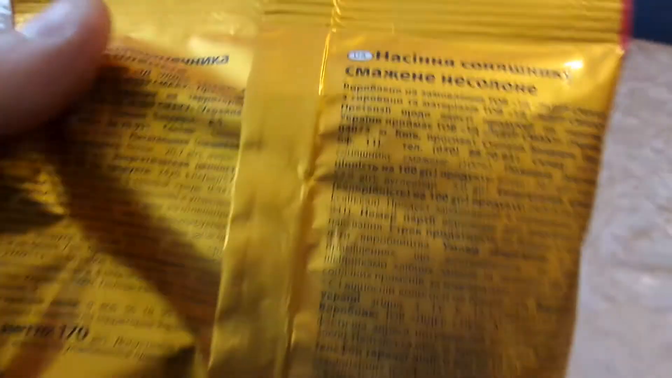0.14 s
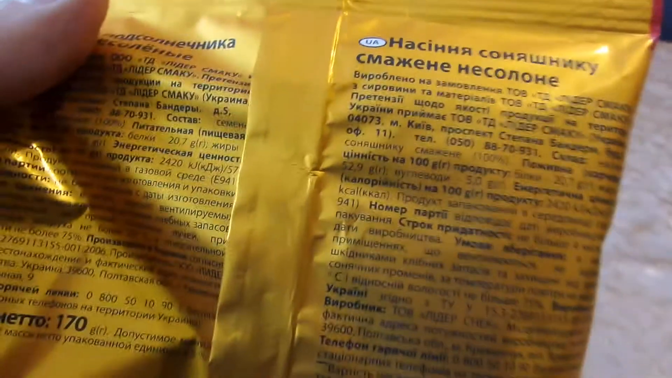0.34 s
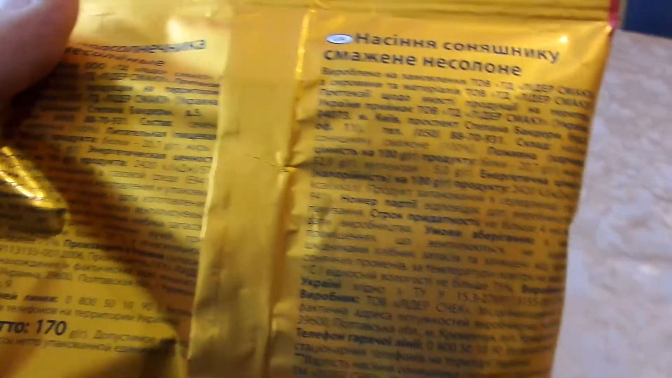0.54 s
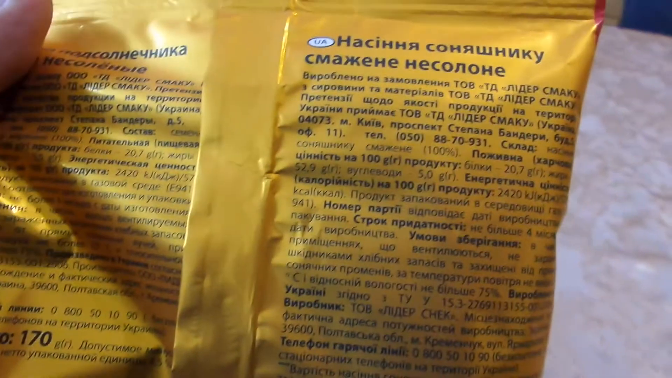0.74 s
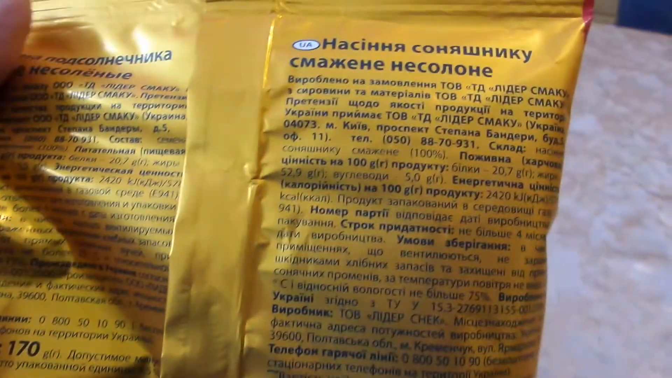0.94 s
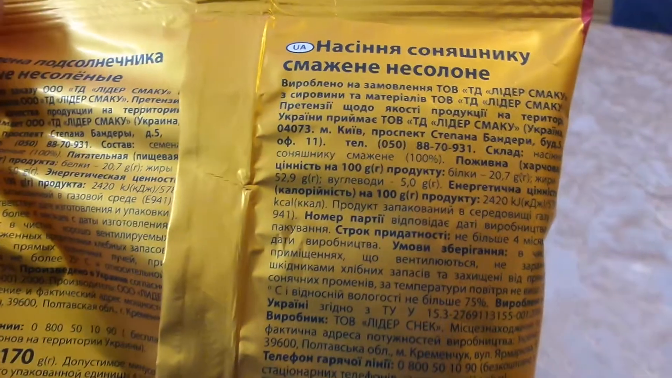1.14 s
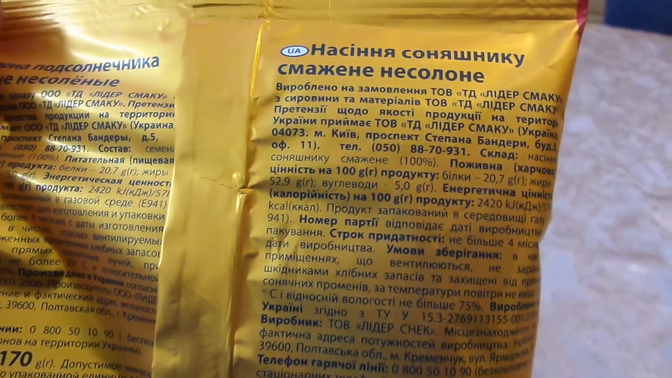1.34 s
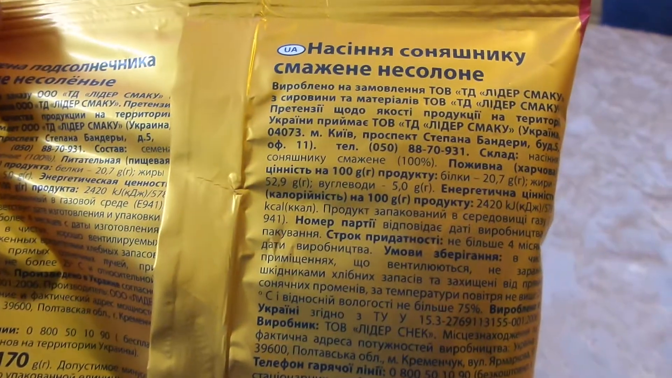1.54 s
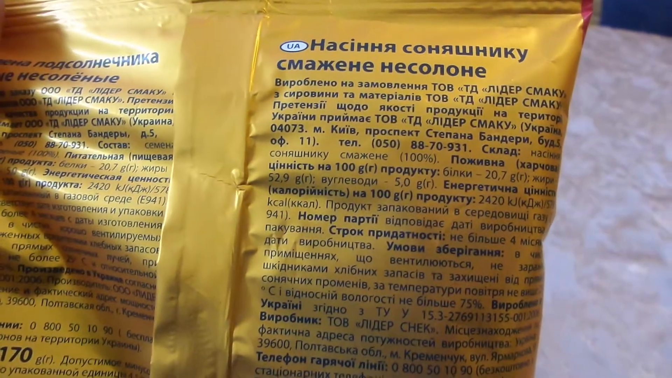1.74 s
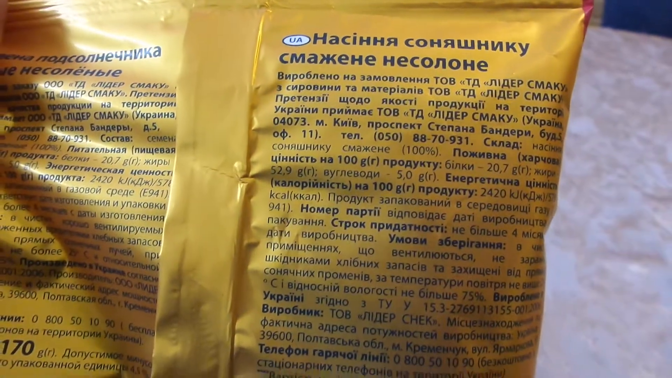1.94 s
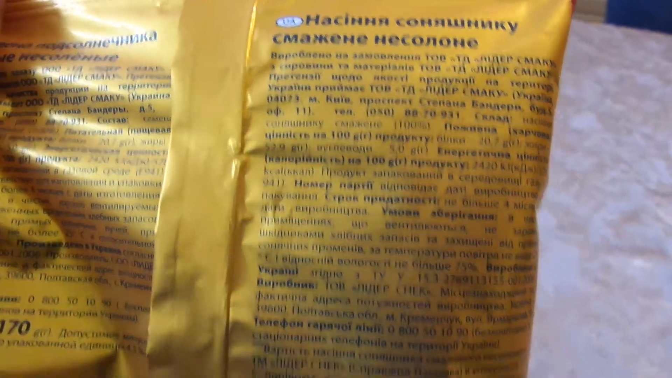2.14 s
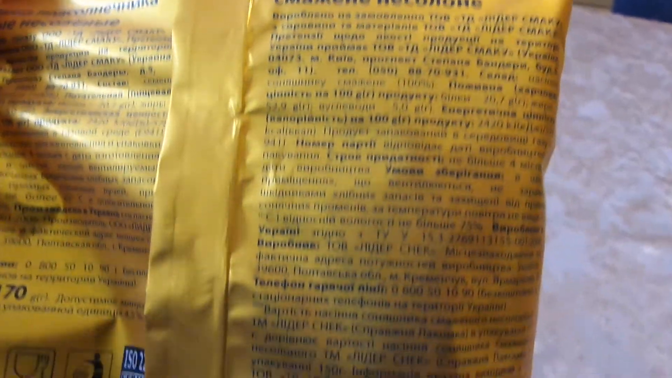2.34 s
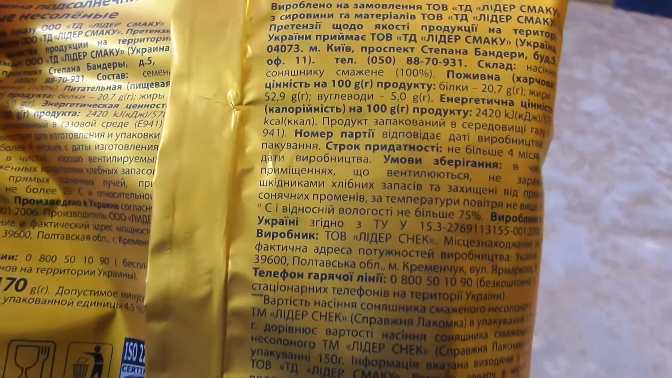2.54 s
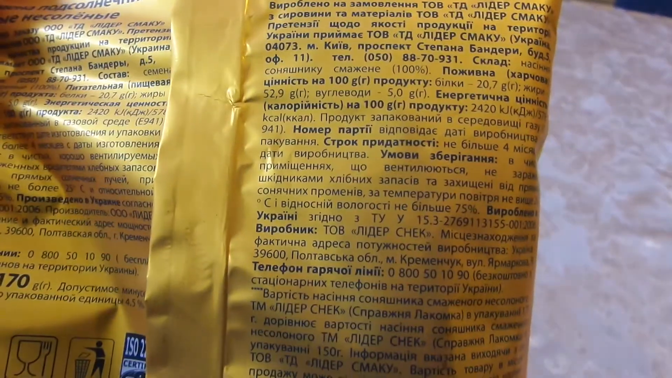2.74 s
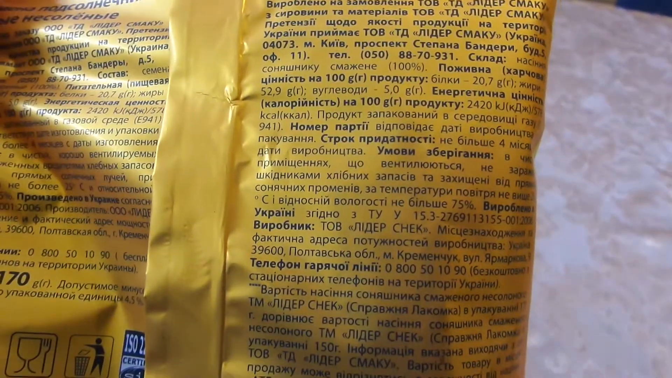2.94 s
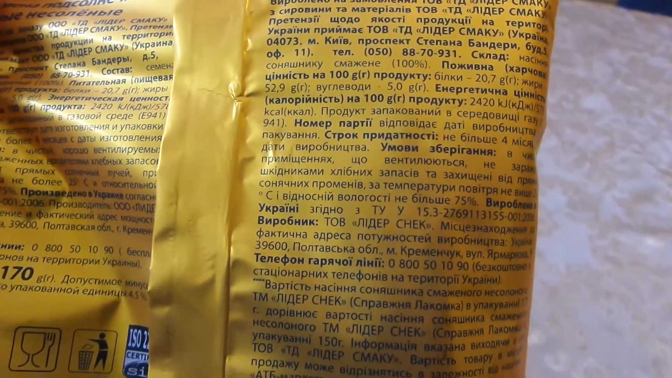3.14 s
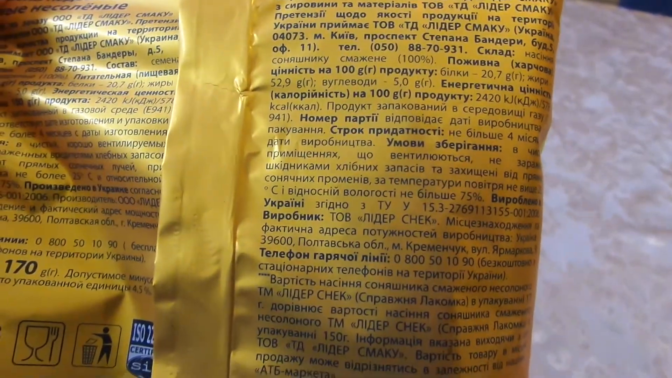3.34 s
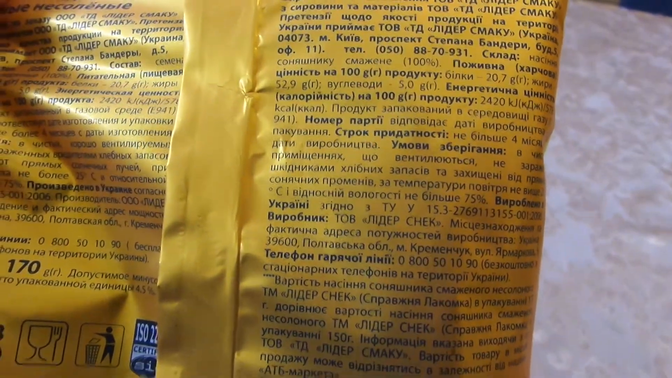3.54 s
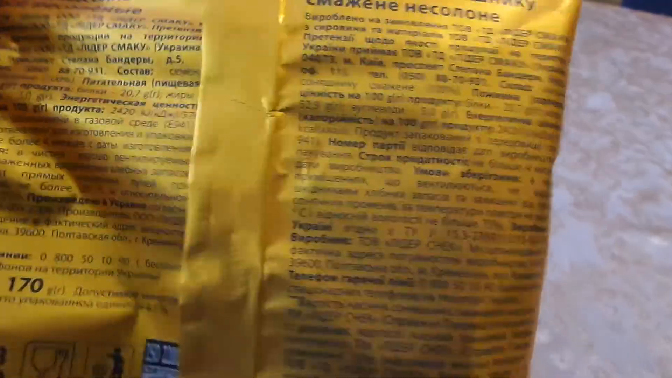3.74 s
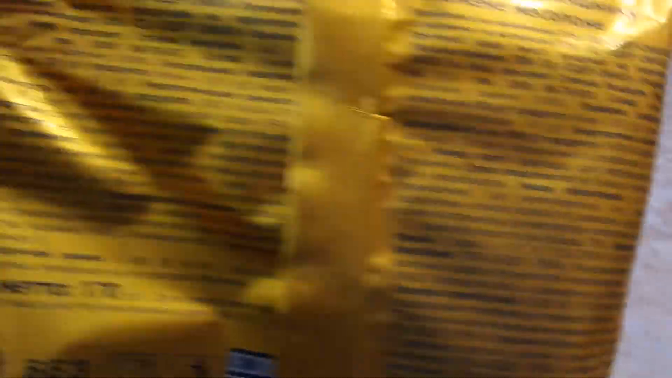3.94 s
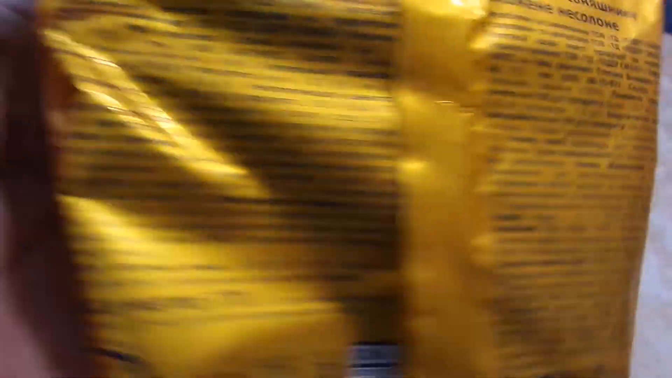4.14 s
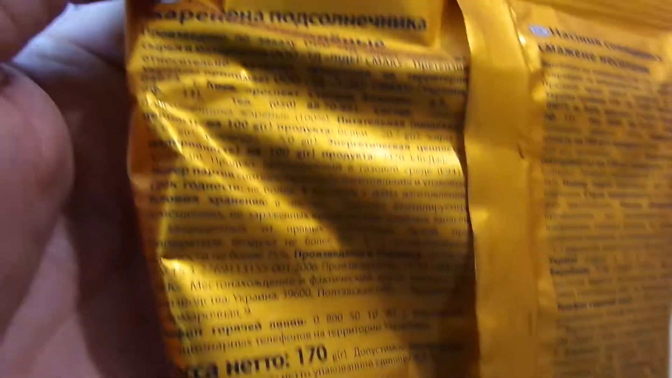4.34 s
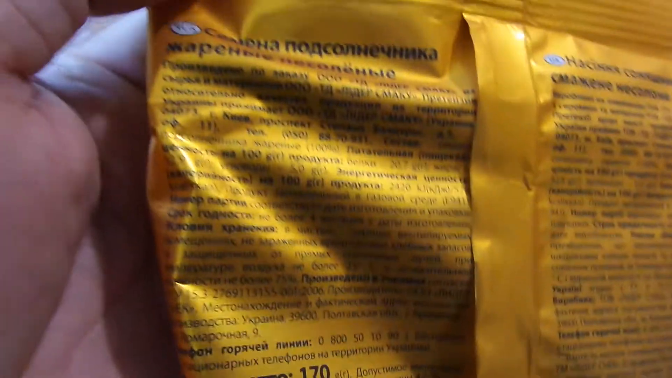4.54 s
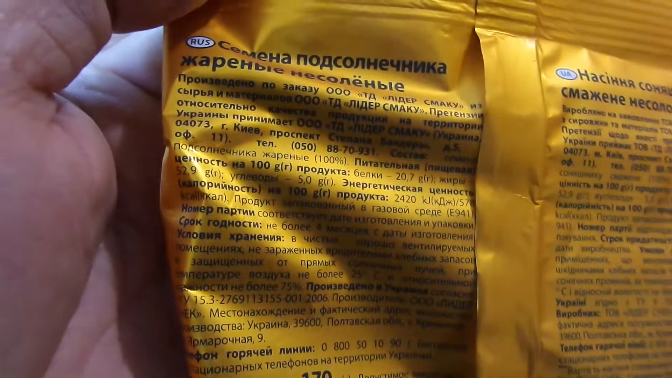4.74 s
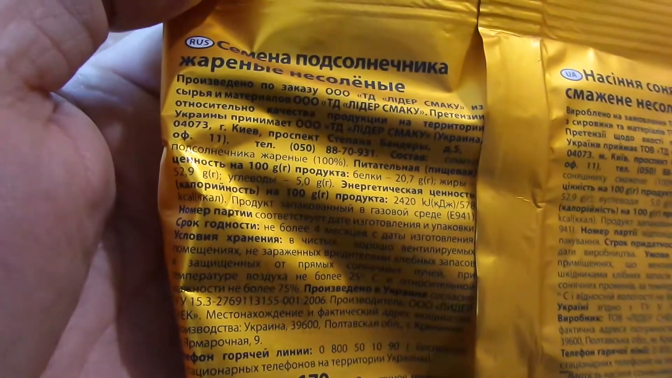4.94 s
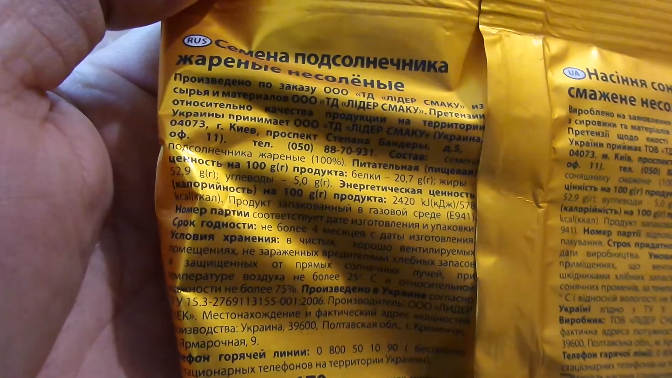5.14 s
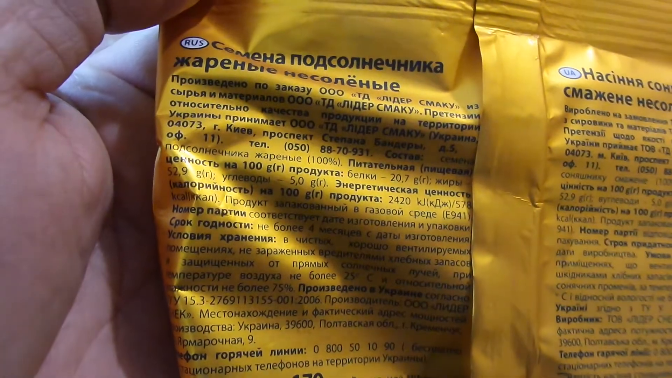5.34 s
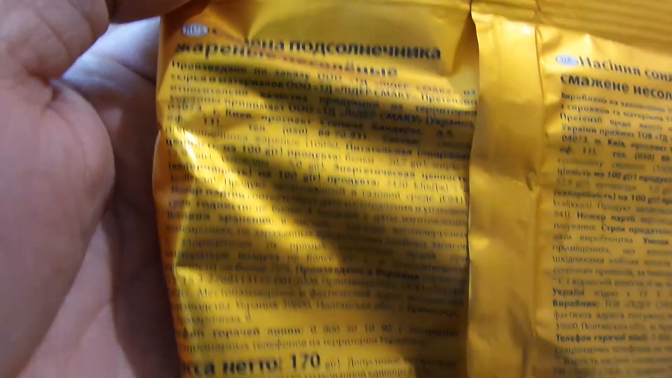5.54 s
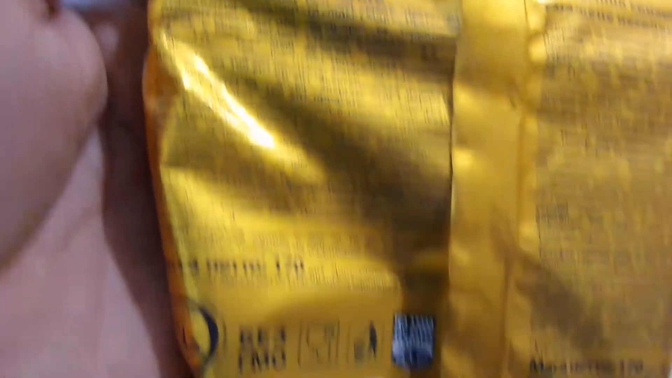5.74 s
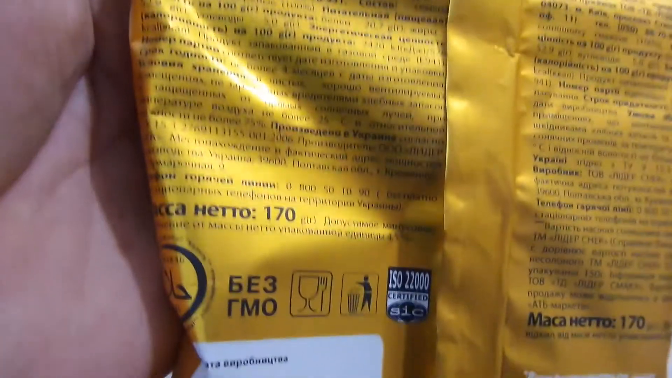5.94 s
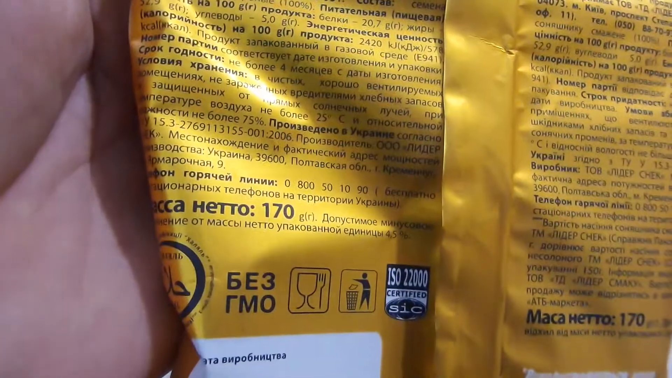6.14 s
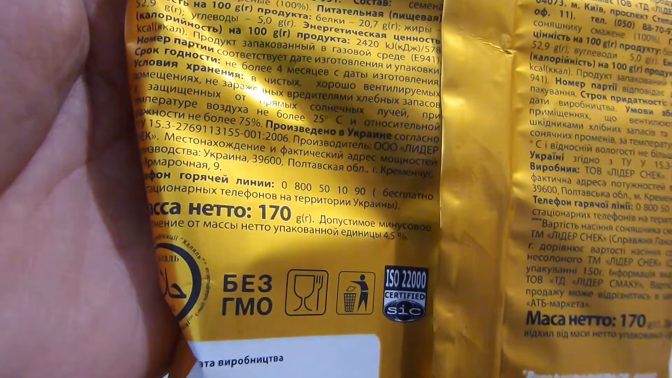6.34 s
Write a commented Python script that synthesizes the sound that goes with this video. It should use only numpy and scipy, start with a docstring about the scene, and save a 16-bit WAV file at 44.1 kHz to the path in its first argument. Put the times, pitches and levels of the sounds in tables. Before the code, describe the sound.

A foil snack bag crinkles and snaps close by in two bursts of handling, with near-silent pauses and faint ticks in a quiet room.

```python
"""A small quiet room: a foil snack bag is turned over in the hands, close to a phone with two microphone ports.
Each drag of the film over the skin is a dense run of random slips, heard as hiss and panel drumming; small
wrinkles tick and snap. Single creases snap through as a jump plus slips ringing crease, film and panel; now and
then the pouch pops as a short decaying sine. A fingertip creaks by stick and slip. Table bounce, short wall
tail, room air, faint hum and a throbbing whine surround it."""
import sys
import numpy as np
from scipy import signal
from scipy.fft import rfft, irfft, next_fast_len
from scipy.io import wavfile
from scipy.ndimage import uniform_filter1d

SR = 44100
rng = np.random.default_rng(int(sys.argv[2]) if len(sys.argv) > 2 else 0)


def generate_wav(sig):
    """Save sig (samples, or channels by samples) to the path in sys.argv[1] as 16-bit PCM at SR."""
    pcm = np.round(np.clip(np.atleast_2d(sig).T, -1, 1) * 32767).astype(np.int16)
    wavfile.write(sys.argv[1], SR, pcm)


N = 282107
TIME = np.arange(N) / SR

# drags of the fingers over the film: start_s, length_s, slide_db, drum_db (levels before the trims in rubbing)
STROKES = [(0, .17, -41.5, -51), (.19, .05, -34.5, -51.5), (.27, .04, -45, -51), (.36, .17, -48, -51),
           (.55, .09, -52, -57.5), (.668, .025, -44, -54), (.755, .04, -48.5, -59), (.9, .12, -47.5, -49.5),
           (1.04, .14, -44.5, -49), (2.27, .03, -61, -69), (2.33, .055, -52, -62.5),
           (3.77, .025, -34.5, -42), (3.86, .075, -35.5, -40), (3.96, .07, -45, -49.5),
           (4.055, .275, -35.5, -42), (4.37, .09, -44, -47), (4.5, .04, -53, -57), (4.585, .022, -42, -48),
           (4.915, .08, -55.5, -58.5), (5.8, .05, -58, -67)]


def undb(db):
    """Decibels to gain."""
    return 10 ** (np.asarray(db) / 20)


def unit(x):
    """Scale to rms 1."""
    return x / np.sqrt(np.mean(x ** 2))


def colour(x, points):
    """Minimum-phase filter through (hz, gain_db) points, interpolated over log frequency."""
    size = next_fast_len(2 * N)
    hz, db = np.transpose(points)
    log_hz = np.log(np.fft.rfftfreq(size, 1 / SR) + 1)
    gain = undb(np.interp(log_hz, np.log(hz), db))
    # folding the cepstrum onto positive time makes the filter causal
    cepstrum = irfft(np.log(gain), size)
    cepstrum[1:size // 2] *= 2
    cepstrum[size // 2 + 1:] = 0
    response = np.exp(rfft(cepstrum))
    return irfft(rfft(x, size) * response, size)[..., :N]


def ring(x, hz, q):
    """One resonance, bandwidth limited to 0.4 SR."""
    b, a = signal.iirpeak(min(hz, .45 * SR), max(q, hz / (.4 * SR)), fs=SR)
    return signal.lfilter(b, a, x)


def blow(x, db):
    """Give a short sound the energy of 5 ms at this rms level."""
    energy = np.mean(np.sum(x ** 2, axis=-1))
    return x * undb(db) * np.sqrt(.005 * SR / energy)


def add(out, start_s, x):
    """Mix a short sound into out."""
    i = max(int(start_s * SR), 0)
    out[:, i:i + x.shape[-1]] += x[..., :N - i]


def late(x, delay_s):
    """Delay, keeping the length."""
    i = max(int(delay_s * SR), 0)
    return np.concatenate([np.zeros_like(x[..., :i]), x[..., :x.shape[-1] - i]], axis=-1)


def walk(steps_per_s):
    """Smooth random wander, spread near 1."""
    k = int(SR / steps_per_s)
    steps = np.repeat(rng.standard_normal(N // k + 1), k)
    return uniform_filter1d(steps, k)[:N]


def grains(per_s, spread_db):
    """Tiny slips at random moments, a few much larger than the rest, scaled to rms 1."""
    size = undb(spread_db * np.minimum(rng.exponential(size=N), 5))
    return unit((rng.random(N) < per_s / SR) * size * rng.standard_normal(N))


def background(air_db=-67.3, pan_db=-5.0, whine_above_hz=1000, pulses_per_s=20, depth=.7):
    """Still room air, more alike at the ports in the bass; mains hum and a throbbing whine, slightly wavering."""
    # room air outline: hz, relative_db
    air_points = [(30, -22.5), (70, -13.5), (140, -2), (200, -2), (350, -2), (1200, -7), (1900, -1),
                  (2700, -8), (6500, -14.5), (9000, -11.5), (15400, -6)]
    # mains hum and thin electrical whine: hz, level_db (rms, before pan)
    tones = [(48.4, -85), (96.9, -85), (4167, -87), (11429, -90), (13189, -86), (13281, -88), (15299, -88)]
    common = colour(rng.standard_normal(N), [(300, 5.5), (1500, -11), (5000, -3)])
    air = unit(colour(common + rng.standard_normal((2, N)), air_points)) * undb(air_db)

    drift = np.cumsum(rng.standard_normal(N)) / 2 / np.sqrt(SR)
    throb = unit(1 + depth * np.sin(2 * np.pi * pulses_per_s * TIME))
    hum = np.zeros(N)
    for hz, db in tones:
        tone = undb(db) * np.sqrt(2) * np.sin(2 * np.pi * hz * TIME + drift * hz / 1000)
        hum += tone * (throb if hz > whine_above_hz else 1)
    return (air + hum) * undb(np.array([[pan_db], [-pan_db]]) / 2)


def stroke(start_s, length_s, attack_s=.024, release_s=.023, settle_db=-27, settle_s=.2):
    """One drag: the film speeds up ahead of start_s, holds, stops, then creeps on faintly."""
    before = np.maximum(start_s - TIME, 0)
    after = np.maximum(TIME - start_s - length_s, 0)
    stop = np.exp(-after / release_s)
    creep = undb(settle_db) * np.exp(-after / settle_s)
    return np.exp(-before / attack_s) * np.maximum(stop, creep)


def handling(hold_slide_db=-72.5, hold_drum_db=-81, drum_exponent=1.15):
    """Slide and drum levels in dB: stroke powers add to a resting grip that is never quite still."""
    power = undb([[hold_slide_db], [hold_drum_db]]) ** 2
    # within each drag the drumming rises later and dies sooner than the hiss
    exponent = np.array([[1], [drum_exponent]])
    for start_s, length_s, slide_db, drum_db in STROKES:
        amplitude = undb([[slide_db], [drum_db]]) * stroke(start_s, length_s) ** exponent
        power = power + amplitude ** 2
    return 10 * np.log10(power)


def rubbing(slide_trim_db=-1.6, drum_trim_db=-3.0, flutter_db=2.0, apart=2.5, drum_apart=.3,
            tick_db=-38, tick_growth=0.58):
    """Film drags over skin: dense slips hiss at the contact and drum on the panels; small wrinkles tick."""
    # sliding film outline: hz, relative_db
    slide_points = [(500, -18), (1200, 0), (1650, -0.5), (2200, 1.8), (2900, -4.8), (4000, 0.5), (6500, -1),
                    (8500, -6), (11000, -11), (15500, -10)]
    # rubbed panel outline: hz, relative_db
    drum_points = [(25, -54), (60, -38), (170, -20.5), (330, -3.5), (490, -8), (680, 1.5), (870, 1),
                   (1050, -7), (1300, -6), (2000, -12.5), (4000, -34)]
    slide_db, drum_db = handling()
    grip_db = flutter_db * walk(45)
    # separate slips per port
    facets = np.array([grains(per_s=12000, spread_db=4.5) for _ in range(2)])
    hiss = unit(grains(per_s=7000, spread_db=2.0) + apart * facets)
    hiss = hiss * undb(slide_db + slide_trim_db + grip_db)
    # ticks stand out in slow handling and drown in the hiss of a quick slide
    ticks = grains(per_s=90, spread_db=2.4) * undb(tick_db + tick_growth * slide_db)
    film = colour(hiss + ticks, slide_points) / np.std(colour(facets[0], slide_points))

    panel_slips = grains(per_s=3000, spread_db=2.0) + drum_apart * facets
    body = unit(colour(panel_slips, drum_points)) * undb(drum_db + drum_trim_db + grip_db)
    return film + body


def snap(decay_ms, crack_db, panel_db, pan_db, scatter=0.3, panel_q=2.7, film_hz=1950, film_q=0.85, crack_q=1.55,
         splinter_db=-13, beaming=0.41, film_trim_db=-1, echo=0.24, film_jump=0.49, slow_s=0.00033):
    """A crease gives way: one sharp jump and a run of tiny slips, heard through crease, film and panel."""
    t = TIME[:2048]
    doublings = np.log2(decay_ms / 2.0)  # against a typical 2 ms
    # panels are all of much the same size: 0.06 octave spread about 775 Hz
    panel_hz = 775 * 2 ** (.06 * rng.standard_normal())
    # a tight kink that cracks more than it moves its panel rings higher, a longer run of slips lower
    crack_hz = 4650 * 2 ** (.011 * (crack_db - panel_db) - .14 * doublings)
    # film level lies halfway between panel and crack; a longer run of slips shakes it more
    film_db = panel_db + .5 * (crack_db - panel_db) + 1.3 * doublings

    own, shared = rng.standard_normal((2, len(t))), rng.standard_normal(len(t))
    fade = scatter * np.exp(-t * 1000 / max(decay_ms, .5))
    jump = t == 0
    # short waves leave the wrinkles differently towards each port, long ones alike
    fine = jump + fade * own
    broad = jump + fade * shared
    # the bending wave comes back from the nearest seam
    seam_s = rng.uniform(.0003, .0012)
    fine = fine - echo * np.roll(fine, int(seam_s * SR), axis=1)

    edge = ring(ring(fine, crack_hz, crack_q), crack_hz, crack_q / 2)
    # a crease that faces the near port beams its highest treble straight in
    edge = edge + undb(splinter_db + beaming * pan_db) * ring(fine, 11000, 1.2)
    sheet = film_jump * jump + fade * (own + shared / 2)
    sheet = ring(ring(sheet, film_hz, film_q), film_hz, film_q)
    belly = ring(ring(broad + 2 * jump, panel_hz, panel_q), panel_hz, 0.9)

    sides = undb(np.array([[1], [-1]]) * (pan_db + 2) / 2)
    crack = sides * blow(edge, crack_db)
    # long bending waves travel more slowly and arrive just after the crack
    slow = blow(sheet, film_db + film_trim_db) + blow(belly, panel_db)
    return crack + late(slow, slow_s)


def wrinkles(per_s=28, spread_db=3, decay_ms=1.8, panel_below_crack_db=5, pan_spread_db=4, max_count=10):
    """Small creases give way at random during a stroke, the stronger the more it works the panels."""
    out = np.zeros((2, N))
    for start_s, length_s, _, drum_db in STROKES:
        for wait_s in np.cumsum(rng.exponential(size=max_count)) / per_s:
            size, side = rng.standard_normal(2)
            crack_db = drum_db + spread_db * size
            if wait_s < length_s:
                panel_db = crack_db - panel_below_crack_db
                add(out, start_s + wait_s, snap(decay_ms, crack_db, panel_db, pan_spread_db * side))
    return out


def snaps():
    """Single creases snap through one by one, from loud cracks to faint ticks."""
    # start_s, decay_ms, crack_db, panel_db, pan_db (left minus right, before the 2 dB left bias in snap)
    creases = [(0.0178, 2.5, -44, -40, 0), (0.074, 2.7, -31.5, -33.5, 0.5), (0.1049, 1.6, -29, -52, -4.5),
               (0.4456, 1.3, -21.5, -39, -2), (0.531, 2, -48, -45, 0), (0.6434, 1.7, -60, -46, 0),
               (0.7365, 1.7, -35, -40, -0.5), (0.9089, 4.8, -30.5, -40, 1), (1.0843, 1.6, -26.5, -36, -5),
               (1.1061, 2.3, -29.5, -37, 0.5), (1.1354, 1.1, -22.5, -44, 12), (1.156, 3.2, -33, -50, -6),
               (1.1774, 3.2, -24.5, -32.5, -3.5), (2.315, 2, -47, -55, 0), (2.3388, 3.4, -30.5, -40, -2),
               (2.5038, 1.2, -60, -76, -3), (2.881, 1.9, -37.5, -49.5, 0.5), (3.555, 1.4, -54, -68, 3),
               (3.7727, 6, -28.5, -38, 1), (3.7855, 2.2, -26.5, -33, -3.5), (3.8136, 1.8, -29.5, -43, 1.5),
               (3.8527, 7.9, -32, -30, 3), (3.9047, 0.9, -24, -36, 0), (3.9182, 1.2, -22.5, -39, 4),
               (4.0277, 3, -47, -38, 3.5), (4.0412, 1.1, -24.5, -40, -9.5), (4.0585, 2, -30, -48, -4),
               (4.0956, 1.6, -26.5, -37, -1), (4.1648, 1.3, -19.5, -40, 5), (4.2348, 5, -40, -29, -10),
               (4.2624, 2.4, -26.5, -36, 1), (4.3136, 1.2, -25, -37, -5), (4.4274, 1.2, -23.5, -38, 0),
               (4.5087, 2.4, -43, -50, -3.5), (4.6164, 0.6, -42, -66, -8), (4.6642, 1.5, -31.5, -71, -7),
               (4.8711, 3, -53, -54, 7), (5.0165, 2.2, -48.5, -56, -2), (5.0452, 2.8, -50, -53, -4),
               (5.7904, 1.7, -43, -38, -14), (5.843, 1.5, -56, -62, -4), (6.3119, 1.2, -61, -72, -13)]
    out = np.zeros((2, N))
    for start_s, decay_ms, crack_db, panel_db, pan_db in creases:
        add(out, start_s, snap(decay_ms, crack_db, panel_db, pan_db))
    return out


def pops(decay_s=.005, rise_s=0.0026):
    """The pouch flexes: a low swing that its air damps within a few cycles."""
    # start_s, pitch_hz, level_db
    flexes = [(.075, 440, -47), (0.646, 228, -52), (0.91, 272, -44.5), (1.087, 318, -51), (1.178, 220, -41),
              (2.342, 480, -52), (2.342, 480, -52), (3.773, 150, -51), (3.853, 276, -41.5),
              (3.905, 515, -38), (4.041, 360, -44), (4.314, 330, -47), (4.402, 423, -39.5)]
    out, t = np.zeros((2, N)), np.arange(4096) / SR
    envelope = np.exp(-t / decay_s) * (1 - np.exp(-t / rise_s))
    for start_s, hz, db in flexes:
        add(out, start_s, blow(np.sin(2 * np.pi * hz * t) * envelope, db))
    return out


def creaks(length_s=0.0092, q=6):
    """A fingertip creaks on the film: a short run of stick and slip rings each resonance of the taut film."""
    # start_s, level_db
    slips_at = [(5.864, -48.5), (5.94, -52), (5.964, -52.5), (6.037, -53), (6.097, -55)]
    # taut film resonances: hz, relative_db
    resonances = [(1650, 0), (1950, -3), (2270, 3)]
    out, window = np.zeros((2, N)), np.hanning(int(length_s * SR))
    for start_s, db in slips_at:
        slips = window * rng.standard_normal((len(resonances), len(window)))
        slips = np.pad(slips, ((0, 0), (0, len(window))))  # room to ring out
        creak = 0
        for run, (hz, gain_db) in zip(slips, resonances):
            creak = creak + undb(gain_db) * ring(ring(run, hz, q), hz, q / 2)
        add(out, start_s, blow(creak, db))
    return out


def room(x, table_s=0.005, table_db=-21, t60_s=.29, walls_db=-7, onset_s=0.0013):
    """A quick bounce off the table, then the short dull tail of the walls as decaying noise."""
    t = TIME[:SR // 2]
    tail = rng.standard_normal((2, len(t))) * undb(-60 * t / t60_s) * (1 - np.exp(-t / onset_s))
    tail /= np.sqrt(np.sum(tail ** 2, axis=1, keepdims=True))
    walls = signal.fftconvolve(x.mean(axis=0)[None], tail, axes=1)[:, :N]
    walls = colour(walls, [(200, 0), (800, -3.5), (4000, -0.5), (8000, -5.5), (14000, -5)])
    return x + undb(table_db) * late(x, table_s) + undb(walls_db) * walls


def scene(right_lag_s=.00023):
    """The bag is nearer the left port, so the right lags; each port has its own colour."""
    # microphone port responses: hz, left_db, right_db
    ports = np.array([(203, 1.5, -1.5), (800, 0, 2.5), (2000, -1, -2), (3000, 3.5, 3.5), (4800, -7.5, -0.5),
                      (7000, -2.5, 2.5), (8500, 5.5, -5.5), (10000, 2, -4.5), (14400, -5.5, -5.5)])
    left, right = room(rubbing() + wrinkles() + snaps() + pops() + creaks())
    left = colour(left, ports[:, :2])
    right = colour(late(right, right_lag_s), ports[:, ::2])
    return np.array([left, right]) + background()


def record(dry, top_hz=16200):
    """The phone cuts the top: a steep elliptic low-pass."""
    return signal.sosfilt(signal.ellip(8, .2, 70, top_hz, fs=SR, output="sos"), dry)


dry = scene()
out = record(dry)
generate_wav(out)
```